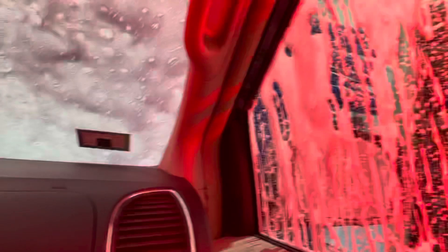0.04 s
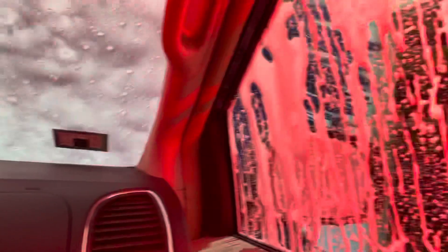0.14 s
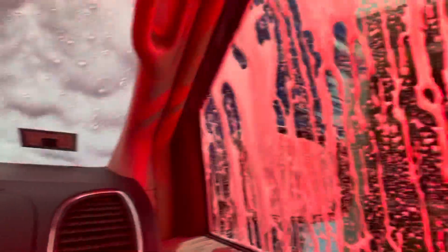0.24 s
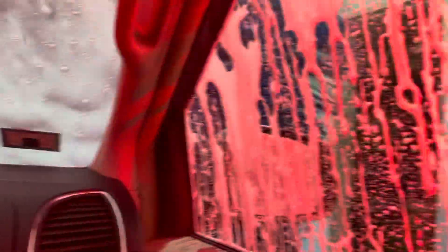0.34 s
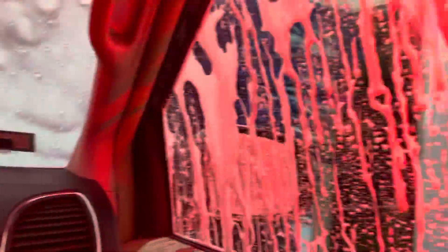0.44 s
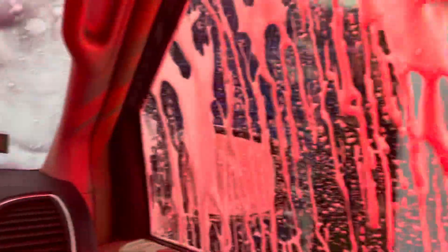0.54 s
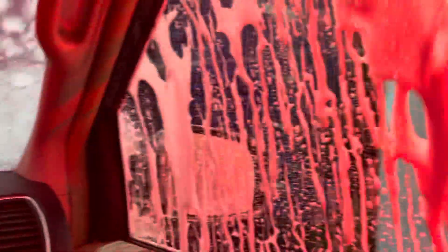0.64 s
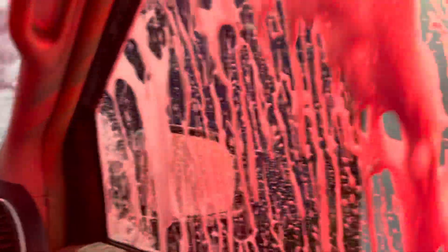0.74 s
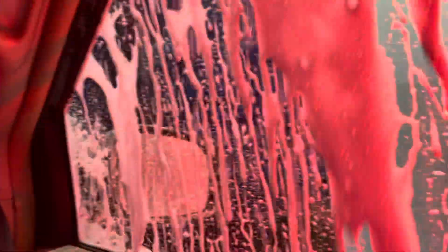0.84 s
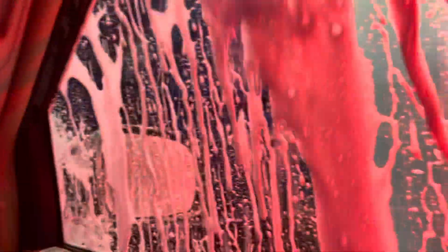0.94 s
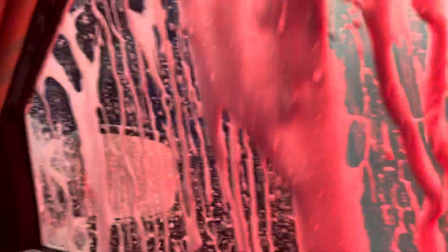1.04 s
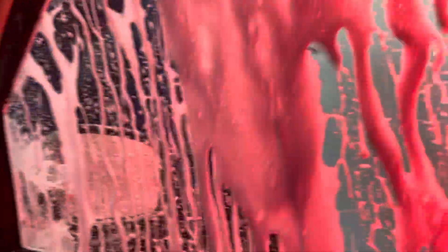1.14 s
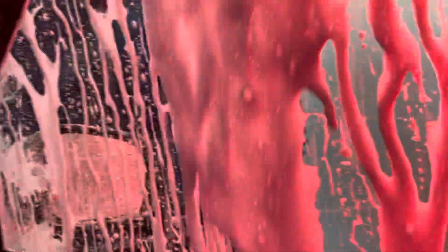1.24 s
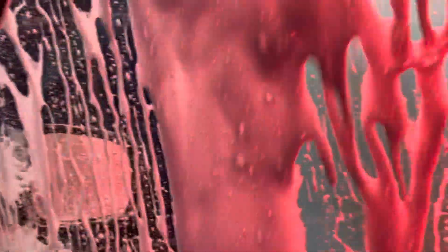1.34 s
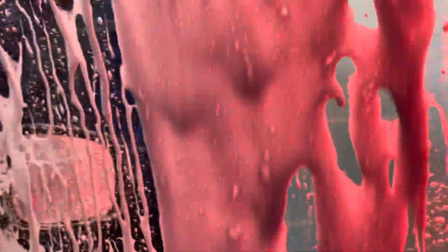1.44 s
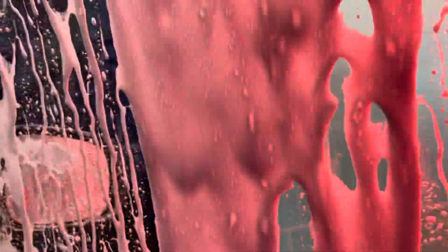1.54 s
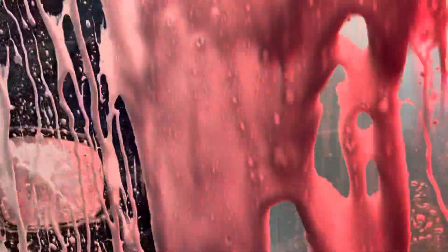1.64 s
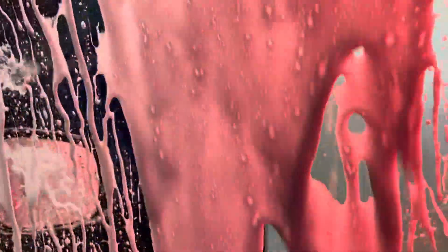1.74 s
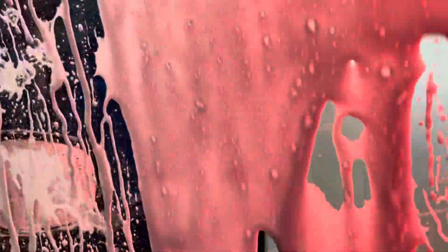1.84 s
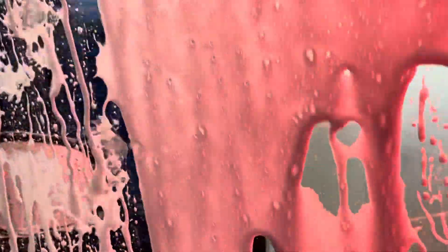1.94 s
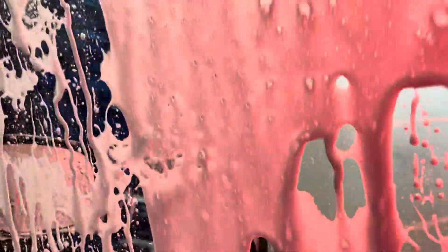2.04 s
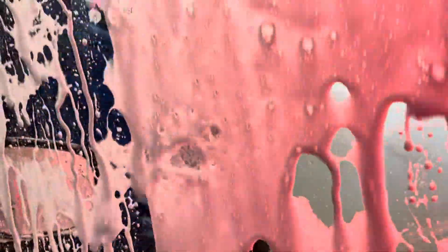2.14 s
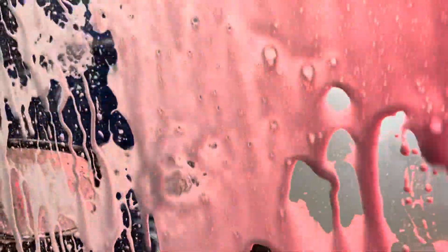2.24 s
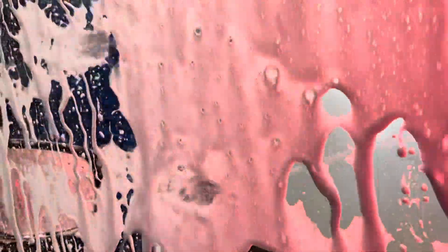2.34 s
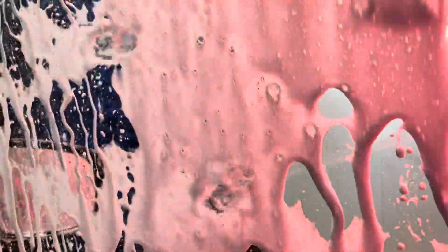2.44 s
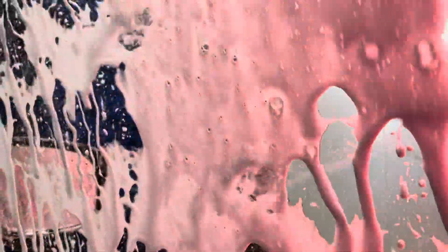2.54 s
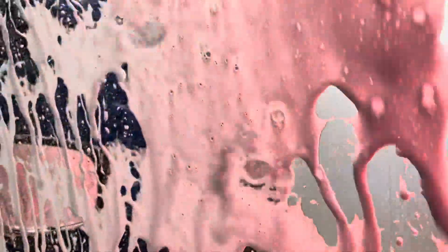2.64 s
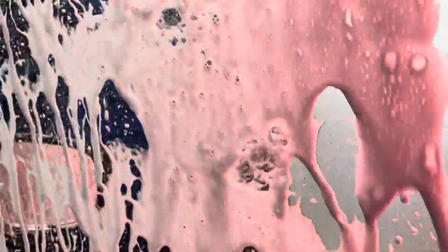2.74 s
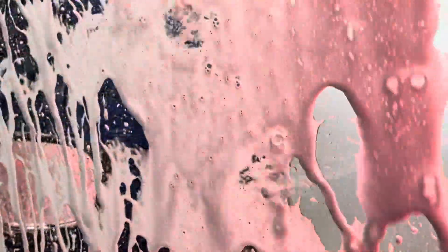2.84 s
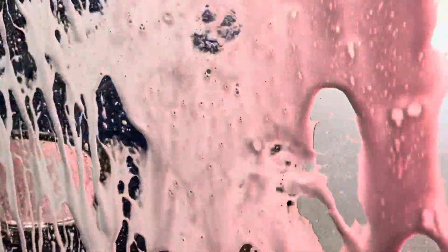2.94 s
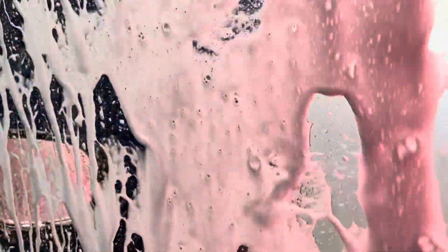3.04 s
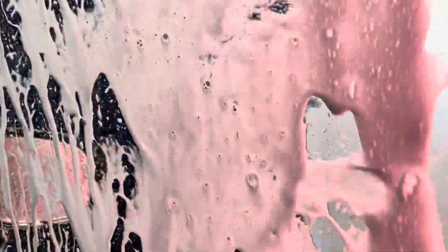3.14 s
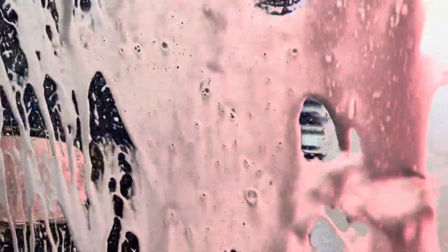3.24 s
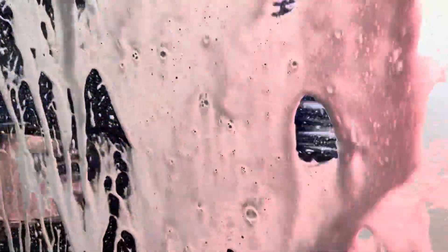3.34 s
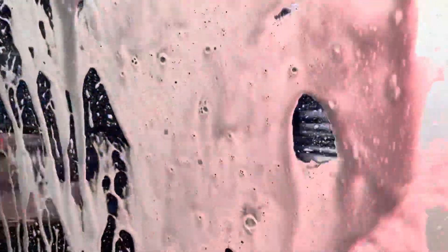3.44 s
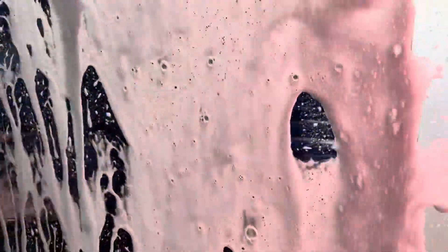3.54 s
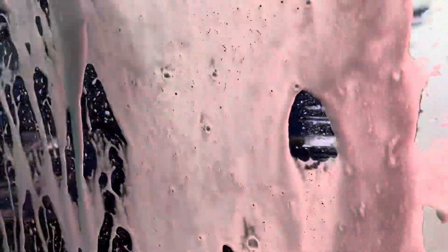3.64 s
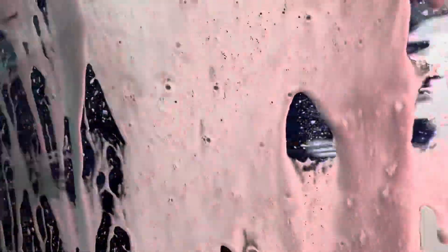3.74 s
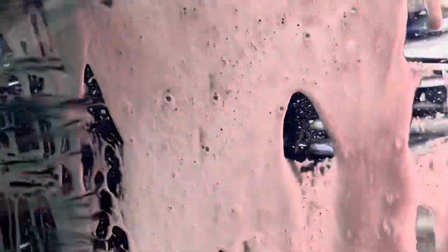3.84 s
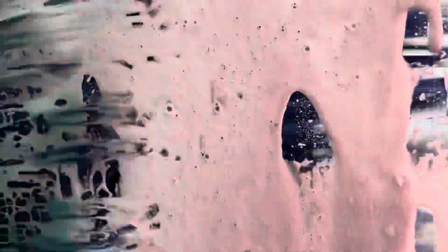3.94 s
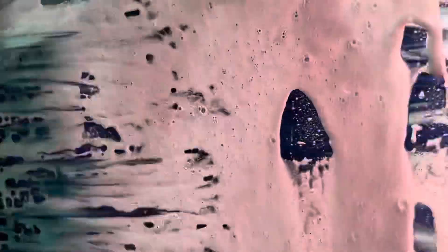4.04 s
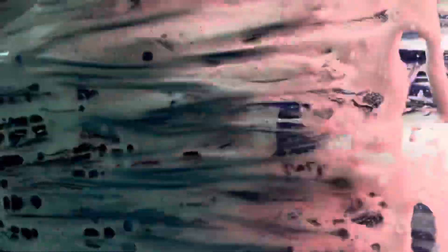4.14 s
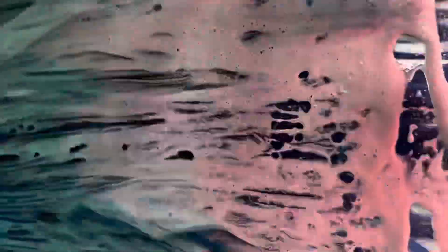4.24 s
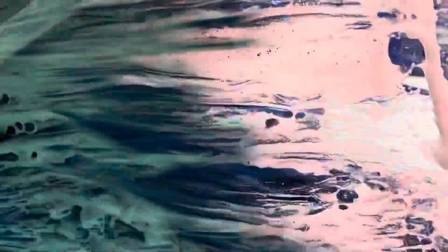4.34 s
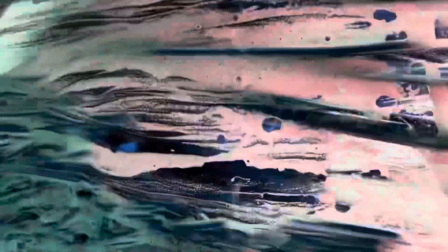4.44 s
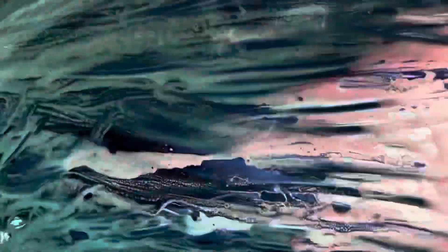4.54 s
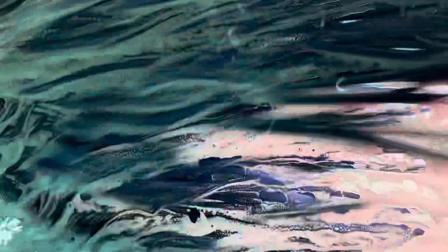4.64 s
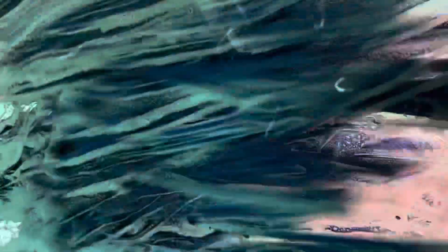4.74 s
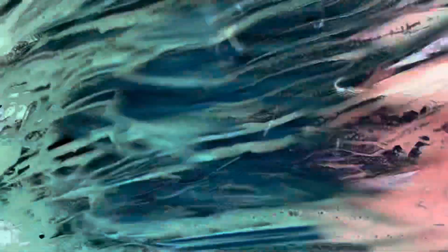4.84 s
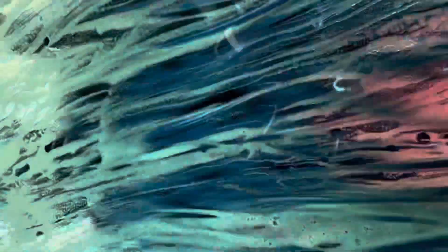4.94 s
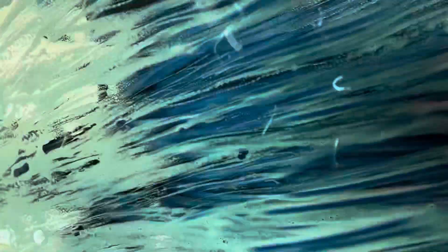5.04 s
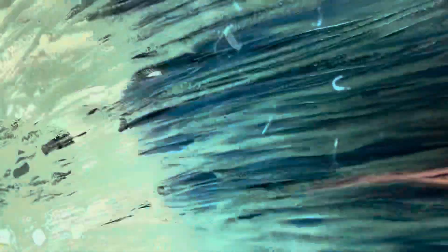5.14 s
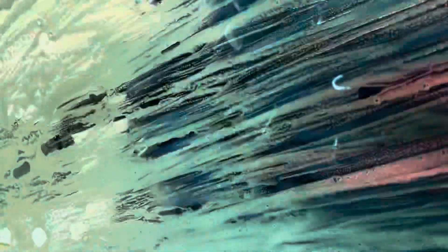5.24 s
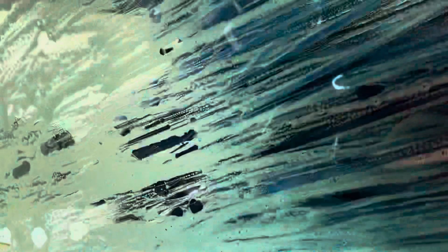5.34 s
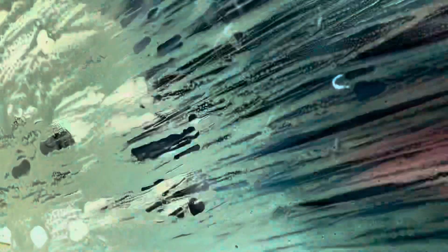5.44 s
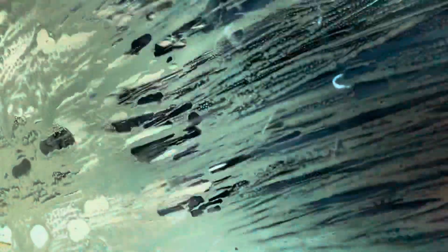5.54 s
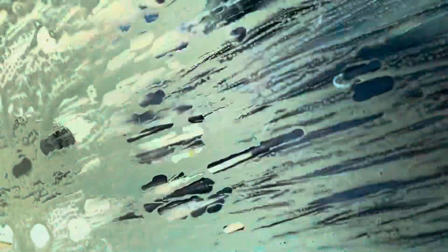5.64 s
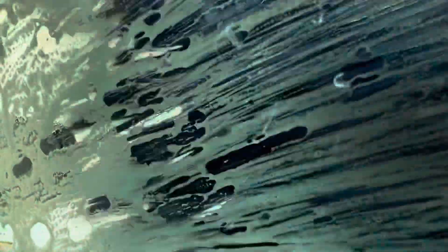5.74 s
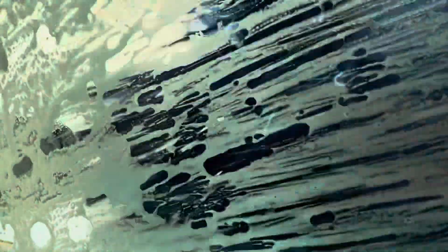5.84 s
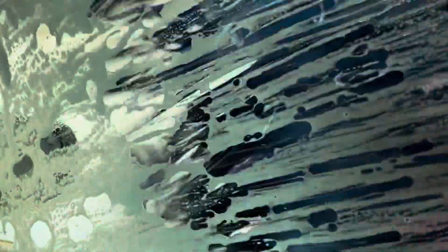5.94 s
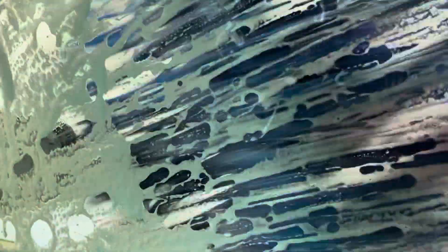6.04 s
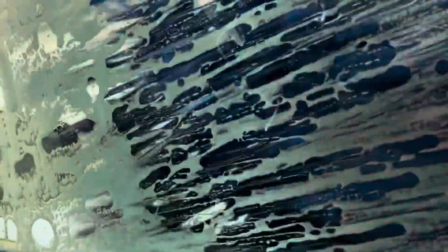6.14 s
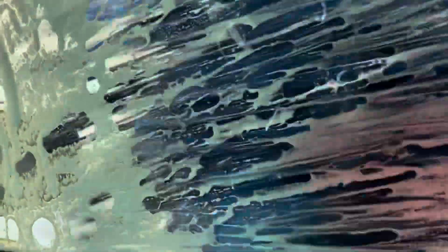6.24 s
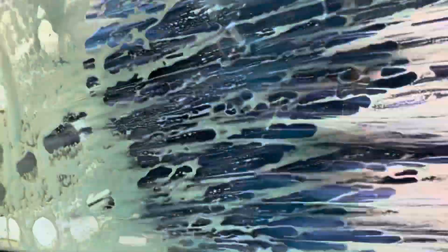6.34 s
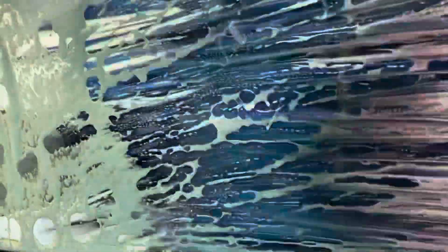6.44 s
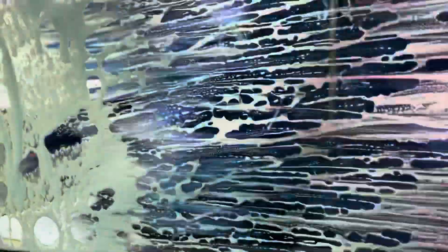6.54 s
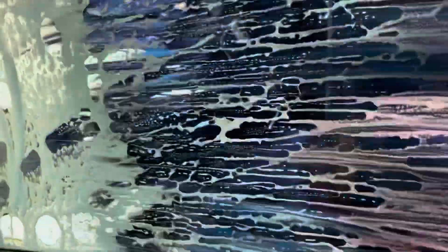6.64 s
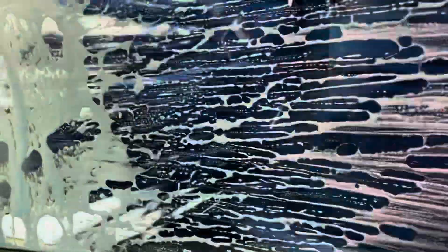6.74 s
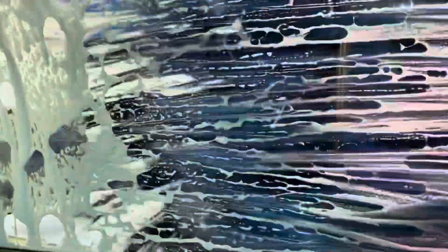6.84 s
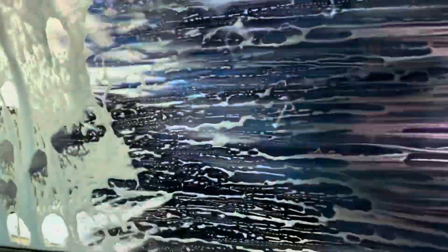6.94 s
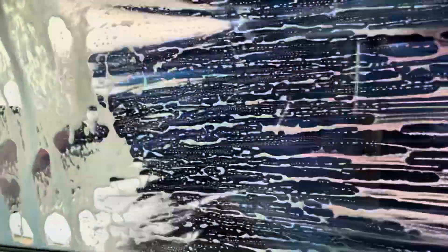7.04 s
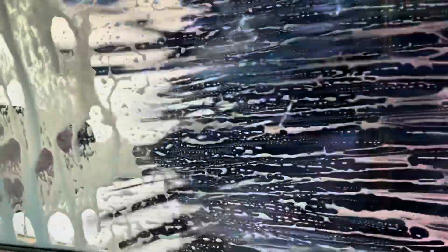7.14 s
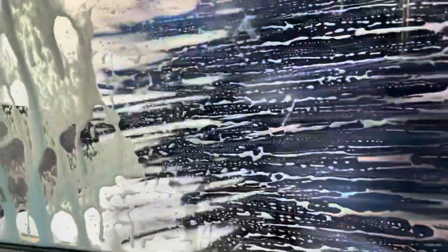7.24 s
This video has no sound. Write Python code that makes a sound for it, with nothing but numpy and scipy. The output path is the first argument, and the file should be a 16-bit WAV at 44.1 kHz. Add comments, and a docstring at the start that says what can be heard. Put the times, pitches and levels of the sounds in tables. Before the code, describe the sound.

The sound is heard in stereo from inside a closed car in a wash tunnel, boomy and short of treble. From 0 to 3.4 seconds water and foam drum deeply on the roof and patter finely on the glass, swelling slightly around 1.2 to 1.5 seconds and then easing. Soft low thumps of loaded panels and a faint, wavering mid-pitched motor whine lie within it. At about 3.5 seconds a spinning cloth brush reaches the side: light wet slaps and tiny ticks come first, growing dense and forceful from 4.3 to 5.1, with dull door knocks, heavy thumps and rough scrubbing. From 5.2 to 6.2 the distinct slaps stop, leaving smoother rubbing, fizzing water, broad swishes and occasional thuds, dipping near 5.8. Pressure returns around 6.2, and irregular slaps, knocks and a few sharp ticks near 6.8 continue over the rumble to the end at about 7.3.

```python
"""Inside a car in a wash tunnel, water and foam patter on the glass and drum on the roof over a faint motor whine.
Then a spinning cloth brush takes over at the side: wet strips slap the window one by one and scrub it.
Shaped noise gives the rubbing and the water, decaying sines the panels, brief resonances the struck glass.
The closed cabin booms and muffles the treble; a few sharp ticks come through. Two microphone ports hear it all.
"""
import sys
import numpy as np
from scipy import signal
from scipy.fft import rfft, irfft, next_fast_len
from scipy.io import wavfile
from scipy.ndimage import uniform_filter1d

SR = 44100
rng = np.random.default_rng(int(sys.argv[2]) if len(sys.argv) > 2 else 0)


def int16_out(signal):
    """Quantize to a 16-bit WAV file."""
    q = np.round(np.clip(np.atleast_2d(signal).T, -1, 1) * 32767)
    wavfile.write(sys.argv[1], SR, q.astype(np.int16))


N = 322371
T = np.arange(N) / SR
FADE_OUT = np.clip((T[-1] - T) / 0.004, 0, 1)
# padded by about a fifth of a second, so that filter tails do not wrap round
FFT_SIZE = 2 * next_fast_len(N // 2 + SR // 10)
HZ = np.maximum(np.fft.rfftfreq(FFT_SIZE, 1 / SR), 1)

# the brush reaches the side and takes over from the spray
ARRIVAL_S, TAKEOVER_S = 3.54, 0.22

# How hard the brush presses on the car. Each row: time in seconds, control level in dB.
BRUSH_PRESS = [(3.4, -20.5), (3.5, -11), (3.72, -9.5), (3.9, -5.5), (4.22, -1), (4.5, -0.5), (4.72, 1.5),
               (5.02, 4), (5.22, -0.5), (5.55, -1.5), (5.83, -5.5), (6.35, 1), (6.85, -2), (7.3, -1)]
# Flow of water and foam onto the car. Each row: time in seconds, control level in dB.
SPRAY_FLOW = [(0, 0.5), (0.6, 1.5), (1.2, 2), (1.47, 2), (1.8, 0), (2.35, -1), (3.3, -0.4)]
# Single cloth strips hitting the window. Each row: start in seconds, relative smack level in dB,
# drag time scale in seconds, ring of the glass in Hz, wet spit relative to the smack in dB,
# relative thud level of the door in dB.
STRIP_SLAPS = [(3.47, -19.5, 0.013, 2570, -24.5, -35.5), (3.501, -24, 0.005, 1490, -27, -38),
               (3.545, -25, 0.01, 2600, -22, -46), (3.633, -20.5, 0.022, 2930.0, -27, -38.5),
               (3.712, -23, 0.011, 1820, -30, -48.5), (3.749, -22.5, 0.02, 1103, -32, -39.5),
               (3.783, -20.5, 0.022, 1510.0, -34, -34.5), (3.827, -14.5, 0.015, 1440, -28, -31.5),
               (3.889, -21.5, .009, 1900, -33, -32), (3.907, -19.5, 0.009, 1120.0, -24, -29.5),
               (3.92, -17, 0.011, 1330, -34.5, -33.5), (3.961, -16, 0.004, 3140, -25, -32.5),
               (3.986, -18, 0.009, 1130, -29, -26), (4.008, -13, 0.0042, 1110, -34.5, -32),
               (4.042, -21, 0.016, 1700, -33, -30), (4.105, -22.5, 0.038, 2130, -24, -26.5),
               (4.149, -25, 0.019, 2650.0, -17, -33), (4.177, -19, 0.015, 1194, -23, -32),
               (4.271, -20, 0.029, 2150.0, -8.5, -24.5), (4.316, -15.5, 0.018, 2640, -25, -28),
               (4.442, -8, 0.012, 2760, -15.5, -25.5), (4.503, -16, 0.018, 1960, -17, -25.5),
               (4.537, -5.5, 0.0098, 2310, -22, -23), (4.595, -14.5, 0.017, 2050.0, -22, -27),
               (4.631, -11.5, 0.0092, 1850, -19, -21.5), (4.663, -20, 0.01, 2690, -12.5, -37.5),
               (4.707, -19, 0.028, 2050, -9.5, -23.5), (4.742, -14.5, 0.013, 2730.0, -15, -26),
               (4.809, -13, 0.013, 2500, -14.5, -25.5), (4.862, -14.5, 0.024, 2730, -18.5, -24.5),
               (4.958, -12.5, 0.014, 2140, -14.5, -20), (4.975, -13.5, 0.009, 1890, -21, -29.5),
               (5.022, -25.5, 0.018, 1630, -19.5, -33), (5.053, -16, 0.02, 1990, -14, -22.5),
               (5.118, -16.5, 0.013, 2060, -29, -36.5), (6.218, -19, 0.026, 2700, -14.5, -28.5),
               (6.386, -15.5, 0.016, 2520, -16, -27.5), (6.546, -21.5, 0.018, 2310, -24, -27),
               (6.628, -15, 0.015, 1950, -29.5, -32.5), (6.757, -19, 0.012, 2050, -27, -26),
               (6.784, -13.5, 0.021, 2570, -26, -30), (6.863, -25, 0.023, 2650.0, -11.5, -33),
               (6.907, -21.5, 0.014, 2200.0, -19, -30.5), (6.924, -16.5, 0.009, 2090, -22.5, -34.5),
               (7.063, -26, 0.0082, 2610.0, -21, -37.5), (7.083, -17, 0.011, 2200, -21.5, -35),
               (7.148, -25, 0.007, 2430.0, -16.5, -31)]
# Spectrum of strips scrubbing the glass. Each row: frequency in Hz, relative level in dB per Hz.
SCRUB_SPECTRUM = [(600, -6), (1100, -3.5), (1650, -4), (2130, -2.5), (2400, 1), (2750, -4), (3300, -8.5),
                  (4200, -24.5), (6000, -53)]
# Spectrum of the fizzing water film. Each row: frequency in Hz, relative level in dB per Hz.
WET_SPECTRUM = [(2000, -5.5), (3200, 8), (4200, 3.5), (5200, -1.5), (6400, -5.5), (8000, -45.5),
                (10000, -11.5), (12300, -20), (14000, -27.5)]
# Spectrum of cloth on the door. Each row: frequency in Hz, relative level in dB per Hz.
DOOR_SPECTRUM = [(180, -20), (330, 7.5), (470, 0.5), (600, 0), (740, 1.5), (930, -4), (1150, -9.5),
                 (1500, -13), (2500, -37.5)]


def undb(db):
    """Amplitude ratio of a level in decibels."""
    return 10 ** (np.asarray(db) / 20)


def unit(x):
    """Normalisation to an rms of 1."""
    return x / np.sqrt(np.mean(x ** 2))


def curves(table):
    """Linear interpolation in time of each column after the first."""
    s, *columns = np.transpose(table)
    return [np.interp(T, s, column) for column in columns]


def over_hz(points):
    """Interpolation of a (Hz, value) table along a logarithmic frequency axis."""
    hz, value = np.transpose(points)
    return np.interp(np.log(HZ), np.log(hz), value)


def colour(x, points):
    """Minimum-phase filter: the folded cepstrum gives a causal response of unit power gain for white noise."""
    roll_off = 1 / (1 + (HZ / points[-1][0]) ** 4)
    magnitude = unit(undb(over_hz(points)) * roll_off)
    cepstrum = irfft(np.log(magnitude), FFT_SIZE)
    cepstrum[1:FFT_SIZE // 2] *= 2
    cepstrum[FFT_SIZE // 2 + 1:] = 0
    response = np.exp(rfft(cepstrum))
    return irfft(rfft(x, FFT_SIZE) * response, FFT_SIZE)[..., :N]


def band(x, hz, q):
    """Single resonance of unit gain at its centre; q is the centre frequency over the bandwidth."""
    return signal.lfilter(*signal.iirpeak(hz, q, fs=SR), x)


def walk(rate):
    """Random fluctuation of about unit spread: independent values, rate per second, joined by ramps."""
    hold = max(int(SR / rate), 2)
    steps = np.repeat(rng.standard_normal(N // hold + 1), hold)
    return unit(uniform_filter1d(steps, hold)[:N])


def fade(x, seconds):
    """Exponential relaxation: every input dies away from its own height with this time constant."""
    return signal.lfilter([1], [1, -np.exp(-1 / (SR * max(seconds, 1 / SR)))], x)


def impacts(rate, spread_db):
    """Random arrivals, rate per second, with exponentially distributed levels."""
    size = undb(spread_db * np.minimum(rng.exponential(size=N), 3.5))
    return (rng.random(N) < rate / SR) * size


def grains(rate, spread_db, ring_s):
    """Shot noise: decaying impact energies modulate noise. Rows: shared by both ports, left only, right only."""
    # energy decays twice as fast as amplitude
    energy = fade(impacts(rate, spread_db) ** 2, ring_s / 2)
    return unit(np.sqrt(energy) * rng.standard_normal((3, N)))


def strike(times, sizes, rise_s, fades_s):
    """Impulsive force: each blow builds up smoothly to its given size and decays exponentially."""
    force = np.zeros(N)
    for s, size, fade_s in zip(times, sizes, fades_s):
        after = slice(int(s * SR), int(s * SR) + SR // 2)
        age = T[after] - s
        build_up = 1 - np.exp(-(age / rise_s) ** 2)
        shape = build_up * np.exp(-age / abs(fade_s))
        force[after] += size * shape / shape.max()
    return force


def swell(times, sizes, rises_s, fades_s):
    """Sliding force: each stroke grows exponentially to its peak and decays exponentially after it."""
    force = np.zeros(N)
    for s, size, rise_s, fade_s in zip(times, sizes, rises_s, fades_s):
        near = slice(max(int(s * SR) - SR // 4, 0), int(s * SR) + SR // 4)
        age = T[near] - s
        scale_s = np.where(age < 0, rise_s, fade_s)
        force[near] += size * np.exp(-np.abs(age / scale_s))
    return force


def driven(table, db, slope):
    """Power-law drive: level db when the control is at 0 dB, growing by slope dB per dB of control."""
    control_db, = curves(table)
    return undb(db + slope * control_db)


def contact():
    """Degree, 0 to 1, to which the brush at the side has replaced the spray."""
    return np.clip((T - ARRIVAL_S) / TAKEOVER_S, 0, 1)


def pressure():
    """Amplitude modulation by the cloth's contact, mostly dipping as it lifts off between bunches of strips."""
    # Each row: middle in seconds, level change in dB, half length in seconds.
    lulls = [(3.675, -0.5, 0.011), (3.873, 3.5, 0.0074), (3.957, -1.5, .009), (3.98, -5, .006),
             (4.078, -3.5, 0.021), (4.224, -5, 0.012), (4.392, -3, 0.015), (4.479, -8, 0.013),
             (4.588, -0.5, 0.0072), (4.678, -4, 0.0079), (4.8, -0.5, 0.0076), (4.946, -1.5, 0.0076),
             (5.014, -5.5, .007), (6.191, -1.5, 0.013), (6.265, -3.5, .012), (6.503, -0.5, .014),
             (6.712, -0.5, .016), (6.961, -2, 0.014), (7.033, -1, 0.0095), (7.119, -3.5, .012),
             (7.235, -4.5, 0.012)]
    change_db = sum(db * np.exp(-((T - s) / length_s) ** 2) for s, db, length_s in lulls)
    return undb(change_db)


def wander(x, centres_hz, depth_db, rate):
    """Changing modal excitation: as the contact point moves, a pane's resonances come forward or recede."""
    return x + sum(band(x, hz, q=6.1) * (undb(depth_db * walk(rate)) - 1) for hz in centres_hz)


def brush():
    """Sliding friction: overlapping strokes of wet strips modulate noise on glass and door."""
    # Freedom of the strips. Each row: time in seconds, 0 = flat on the glass to 1 = only the tips reach it.
    flail_curve = [(3.7, 0.6), (4.4, 0.39), (4.75, 0.38), (5.05, 0.35), (5.35, 0.17), (6.05, 0.19),
                   (6.6, 0.33), (7.3, 0.28)]
    # Regions in which the side window rings when rubbed, in Hz.
    pane_hz = [1250, 2000, 3060]
    flail = np.clip(curves(flail_curve)[0], 0, 1)
    # free strips rub choppily, flat ones smoothly
    chop = np.clip(0.99 * flail, 0, 0.4)
    strokes = fade(fade(impacts(rate=71, spread_db=1.0) ** 2, 0.0083), 0.0014)
    drag = np.sqrt(1 - chop + chop * strokes / strokes.mean())
    # while the strips fly freely, less of their force goes into rubbing
    scrub_gain = driven(BRUSH_PRESS, db=-35.0, slope=0.52) * undb(-9 * flail)
    rub_gain = driven(BRUSH_PRESS, db=-32.0, slope=0.57) * undb(-2.5 * flail)
    fizz_gain = driven(BRUSH_PRESS, db=-39.3, slope=0.41) * undb(-12.5 * flail + 1.4 * walk(22))
    sliding = grains(rate=1500, spread_db=-1.5, ring_s=0.0045) * drag
    # threads catch and snap free on the glass in a fine, uneven crackle
    threads = undb(-2.5) * grains(rate=300, spread_db=3.0, ring_s=0.0016)
    scrub = wander(colour(sliding + threads, SCRUB_SPECTRUM), pane_hz, depth_db=2.0, rate=28)
    rub = colour(grains(rate=980, spread_db=2.5, ring_s=0.0095) * drag, DOOR_SPECTRUM)
    # the water film fizzes as it is wiped off
    fizz = colour(grains(rate=2200, spread_db=4.0, ring_s=0.0079) * np.sqrt(drag), WET_SPECTRUM)
    return (scrub * scrub_gain + rub * rub_gain + fizz * fizz_gain) * pressure()


def slaps():
    """Impact followed by friction: a strip smacks the glass, spits out water, wipes, and thuds on the door."""
    # Thud on the door. Each row: frequency in Hz, relative level in dB per Hz.
    thud_spectrum = [(150, -6.5), (240, 4.5), (320, 1.5), (450, -1.5), (600, -3), (760, -1), (950, -7.5),
                     (1400, -14.5), (2200, -44)]
    s, peak_db, drag_s, _, spit_db, thud_db = np.transpose(STRIP_SLAPS)
    thud = strike(s, undb(thud_db), rise_s=0.0033, fades_s=1.93 * drag_s)
    spit = strike(s, undb(peak_db + spit_db - 5.5), rise_s=0.0057, fades_s=0.37 * drag_s)
    # the wipe and the spatter peak after the blow itself
    wipe = swell(s + 0.34 * drag_s, undb(peak_db - 16.5), rises_s=0.8 * drag_s, fades_s=0.51 * drag_s)
    spatter_size = undb(peak_db + spit_db - 6.5)
    spatter = swell(s + 0.78 * drag_s, spatter_size, rises_s=0.73 * drag_s, fades_s=0.78 * drag_s)
    drops = grains(rate=3700, spread_db=4.0, ring_s=0.0012)
    water = colour(np.hypot(spit, spatter) * drops, WET_SPECTRUM)
    cloth = colour(wipe * grains(rate=700, spread_db=1.5, ring_s=0.0018), SCRUB_SPECTRUM)
    door = colour(thud * rng.standard_normal((3, N)), thud_spectrum)
    return smacks() + water + cloth + door


def smacks():
    """Resonant impact: a cluster of droplets hits the wet glass and excites one brief ring per strip."""
    # Each row: frequency in Hz, relative level in dB per Hz.
    smack_spectrum = [(400, 11), (900, 4), (1500, 2), (2150, 4.5), (2700, 0), (3400, -4), (5000, -33.5)]
    out = np.zeros((3, N))
    droplets = grains(rate=1400, spread_db=2.4, ring_s=0.0009)
    for s, peak_db, drag_s, ring_hz, _, _ in STRIP_SLAPS:
        after = slice(int(s * SR), int(s * SR) + SR // 5)
        blow = strike([s], [undb(peak_db - 11.0)], rise_s=0.002, fades_s=[1.16 * drag_s])
        hit = droplets[:, after] * blow[after]
        ring = band(hit, ring_hz, q=6.3)
        out[:, after] += undb(-6.5) * hit + undb(3.5) * ring
    return colour(out, smack_spectrum)


def swishes():
    """Fluttering friction: a bundle of strips slides across the wet glass as a swell of fibre and water noise."""
    # Each row: peak time in seconds, relative level in dB, rise and fall time in seconds.
    bundles = [(3.798, -42.5, .012), (3.999, -35.5, 0.006), (4.125, -40, 0.011), (5.225, -34.5, 0.018),
               (5.33, -35.5, 0.017), (5.42, -37, 0.032), (5.511, -40.5, .02), (5.72, -42.5, 0.076),
               (5.96, -37.5, 0.038), (6.16, -36, 0.054), (6.31, -33, 0.026), (6.467, -35, 0.023),
               (6.585, -36, 0.029)]
    s, peak_db, length_s = np.transpose(bundles)
    flutter = undb(1.4 * walk(70))
    stroke = swell(s, undb(peak_db), length_s, length_s) * flutter
    fibres = colour(grains(rate=1400, spread_db=3.5, ring_s=0.002), SCRUB_SPECTRUM)
    water = colour(grains(rate=1300, spread_db=2.5, ring_s=0.0033), WET_SPECTRUM)
    return stroke * (fibres + undb(-3.0) * water)


def pummels():
    """Modal ringing: bunches of soaked cloth knock the door skin in two damped modes under a dull splat."""
    # Each row: start in seconds, relative level in dB, pitch of the lowest mode in Hz.
    knocks = [(4.276, -15, 450), (4.532, -21.5, 395), (4.589, -17.5, 293), (4.624, -14, 311),
              (4.695, -19, 259), (4.716, -20.5, 277), (4.742, -22, 289), (4.815, -14, 344),
              (4.841, -17, 247), (4.867, -16, 306), (4.917, -14.5, 346), (4.975, -17.5, 374),
              (4.993, -15, 254), (5.022, -12, 255), (5.056, -16, 291), (5.098, -17, 285), (5.168, -15, 286),
              (5.209, -15.5, 284), (5.252, -18, 274), (5.508, -18, 289), (5.682, -20, 258.5),
              (6.089, -16, 272), (6.332, -22.5, 281), (6.458, -20, 224.5), (6.536, -17.5, 312),
              (6.630, -21.5, 259), (6.744, -17, 289), (6.884, -19.5, 258), (7.078, -17, 287),
              (7.173, -17.5, 273)]
    overtone_ratio, overtone_db = 1.9, -13.5
    out = np.zeros((3, N))
    splat = colour(rng.standard_normal((3, N)), DOOR_SPECTRUM)
    for s, peak_db, hz in knocks:
        after = slice(int(s * SR), int(s * SR) + SR // 6)
        swing = strike([s], [undb(peak_db - 2.0)], rise_s=0.0048, fades_s=[0.008])[after]
        angle = 2 * np.pi * (hz * (T[after] - s) + rng.random())
        modes = np.sin(angle) + undb(overtone_db) * np.sin(overtone_ratio * angle)
        out[0, after] += swing * modes
        out[:, after] += swing * undb(-13.5) * splat[:, after]
    return out


def ticks():
    """Short impact, wide spectrum: flung drops snap on the glass, ping it and may crack in the top treble."""
    # Each row: start in seconds, relative level in dB, ring time scale in seconds,
    # treble crack relative to the tick in dB.
    drops = [(3.466, -36.5, 0.0043, -30), (3.5725, -39.5, 0.0029, -30), (3.802, -39, 0.0059, 2),
             (3.8145, -37.5, 0.0028, 5), (4.155, -39.5, 0.0025, -20), (4.266, -40, .004, -4.5),
             (4.451, -30.5, 0.0061, -2), (4.4565, -39, 0.0071, -2), (4.711, -38.5, .005, -18),
             (4.81, -37.5, 0.0047, 0), (6.3889, -56.5, 0.0061, -10.5), (6.797, -33, 0.0084, 0.5),
             (6.812, -34, 0.0066, -10), (6.8359, -38, 0.01, -6)]
    # Each row of both spectra: frequency in Hz, relative level in dB per Hz.
    tick_spectrum = [(1500, -10), (3000, 9.5), (5500, 6), (7000, -9)]
    crack_spectrum = [(5000, -3.5), (8000, -12), (10500, -5.5), (12500, -9.5), (15500, -12.5)]
    s, peak_db, ring_s, crack_db = np.transpose(drops)
    snap = strike(s, undb(peak_db + 3.0), rise_s=0.00022, fades_s=0.22 * ring_s)
    tick = strike(s, undb(peak_db - 6.0), rise_s=0.00089, fades_s=ring_s)
    crack = strike(s, undb(peak_db + crack_db - 3.0), rise_s=0.0004, fades_s=0.45 * ring_s)
    knock = colour(np.hypot(snap, tick) * rng.standard_normal((3, N)), tick_spectrum)
    ping = undb(1.0) * band(knock, hz=3670, q=16) + undb(4.0) * band(knock, hz=2590, q=22)
    return knock + ping + colour(crack * rng.standard_normal((3, N)), crack_spectrum)


def body():
    """Structure-borne sound: water and cloth shake the roof and side panels, which pump the cabin's air."""
    # Each row of the three spectra: frequency in Hz, relative level in dB per Hz.
    boom_spectrum = [(20, -10), (30, -8), (40, 4), (52, 12), (68, 11.5), (95, 10.5), (120, 9), (160, -8.5),
                     (300, -66.5)]
    drum_spectrum = [(70, -21), (105, -12), (130, 0), (155, 4.5), (178, -0.5), (205, -13.5), (300, -25)]
    panel_spectrum = [(100, -23.5), (160, 0.5), (200, 4.5), (260, 1.5), (320, -4), (400, -9.5),
                      (700, -63.5)]
    # the water's share of the power falls as the brush takes over
    water = np.sqrt(1 - np.clip(0.44 * contact(), 0, 1))
    # independent sources add in power
    boom_gain = np.hypot(water * driven(SPRAY_FLOW, db=-27.0, slope=0.38),
                         driven(BRUSH_PRESS, db=-21.0, slope=0.46))
    roof_gain = np.hypot(water * driven(SPRAY_FLOW, db=-28.5, slope=2.4),
                         driven(BRUSH_PRESS, db=-25.5, slope=0.96))
    side_gain = np.hypot(water * driven(SPRAY_FLOW, db=-33.0, slope=0.64),
                         driven(BRUSH_PRESS, db=-26.5, slope=0.73))
    boom = colour(grains(rate=6800, spread_db=6.0, ring_s=0.02), boom_spectrum)
    roof = colour(grains(rate=1300, spread_db=2.5, ring_s=0.0099), drum_spectrum)
    sides = colour(grains(rate=600, spread_db=0.5, ring_s=0.0081), panel_spectrum)
    return boom * boom_gain + roof * roof_gain + sides * side_gain * pressure()


def thumps():
    """Damped oscillation: a load of water or cloth pushes a panel in, and it swings back a few times."""
    # Each row: start in seconds, relative level in dB, panel pitch in Hz.
    blows = [(0.18, -21, 100), (0.455, -18, 123.5), (0.692, -14, 133), (1.204, -20.5, 139.5),
             (1.257, -19, 100.3), (1.417, -14.5, 107.6), (1.763, -18, 72.4), (1.916, -20, 87),
             (2.522, -12.5, 83.2), (2.754, -15.5, 82), (4.29, -12, 123.6), (4.39, -9.5, 92.7),
             (4.446, -11.5, 101), (4.559, -12, 118), (4.77, -14, 110), (4.862, -12, 79), (4.97, -14.5, 112),
             (5.07, -11.5, 125.4), (5.345, -13, 130.6), (5.538, -17, 93.7), (5.845, -12.5, 107.7),
             (6.184, -15.5, 215.6), (6.231, -14, 83), (6.309, -14.5, 108), (6.391, -14.5, 96),
             (6.453, -17.5, 94), (6.607, -11.5, 90.6), (6.746, -18.5, 98.6), (6.926, -12.5, 103)]
    out = np.zeros((3, N))
    for s, peak_db, panel_hz in blows:
        after = slice(int(s * SR), int(s * SR) + SR // 4)
        swing = strike([s], [undb(peak_db)], rise_s=0.0093, fades_s=[0.018])[after]
        angle = 2 * np.pi * (panel_hz * (T[after] - s) + rng.random())
        out[0, after] += swing * np.sin(angle)
    return out


def passes():
    """Resonance under random force: a panel drones unevenly while a jet or the brush travels over it."""
    # Each row: middle in seconds, half length in seconds, panel pitch in Hz, sharpness (q), relative level in dB.
    drones = [(1.383, 0.31, 742, 3.5, -40.5), (1.65, 0.25, 74.3, 1.2, -29), (4.304, 0.29, 134.4, 2.7, -27),
              (4.967, 0.47, 310, 2.6, -33), (4.848, 0.23, 2020, 6.4, -39), (6.489, 0.47, 71, 0.78, -25.5),
              (6.55, 0.55, 204, 3, -31.5)]
    out = 0
    for s, length_s, hz, q, peak_db in drones:
        noise = rng.standard_normal((3, N))
        ring = unit(band(band(noise, hz, q), hz, q))
        approach = np.exp(-((T - s) / length_s) ** 2)
        out = out + ring * undb(peak_db + 1.8 * walk(14)) * approach
    return out


def spray():
    """Shot noise of drop impacts: fine drops patter on the glass and heavier ones splash on the roof."""
    # Each row of both spectra: frequency in Hz, relative level in dB per Hz.
    glass_spectrum = [(600, -13.5), (1100, -4), (1600, -4.5), (2100, -3.5), (2400, 0.5), (2750, -5.5),
                      (3300, -7), (4200, -13.5), (5300, -18), (6500, -23), (8000, -60.5), (10000, -24),
                      (12300, -31), (14000, -36)]
    roof_spectrum = [(200, -10), (350, 1.5), (480, 0.5), (600, -1.5), (740, 0.5), (850, -3), (1050, -11.5),
                     (1400, -13.5), (2500, -30)]
    surge_db = 0.19 * walk(13)
    fine = grains(rate=2400, spread_db=2.2, ring_s=0.005)
    heavy = grains(rate=900, spread_db=1.6, ring_s=0.008)
    patter = colour(fine, glass_spectrum) * driven(SPRAY_FLOW, db=-43.5, slope=0.59)
    splash = colour(heavy, roof_spectrum) * driven(SPRAY_FLOW, db=-41.0, slope=1.17)
    return (patter + splash) * undb(surge_db)


def motor():
    """Frequency modulation: the machinery outside whines faintly at a wavering pitch, shared by both ports."""
    whine_hz = 711 * (1 + 0.01077 * walk(25))
    phase = 2 * np.pi * np.cumsum(whine_hz) / SR
    whine = np.sin(phase) * undb(-51 + 3.5 * walk(7.8))
    return whine * np.array([[1], [0], [0]])


def cabin():
    """Modal response of an enclosure: sound inside is coloured by resonances of air, panels and panes."""
    # Each row: centre in Hz, width in Hz, lift of this mode alone in dB.
    modes = [(50.3, 4, 6.5), (90.7, 20, 3.5), (213.6, 27, 4), (272.5, 16, 3.5), (332, 42, 3.5),
             (440.6, 35, 5.5), (508.3, 26, 5.5), (591, 42, 4), (714, 18, 3.5), (780, 22, 2), (917, 63, 4),
             (1028, 31, 5), (1247, 130, 3.5), (1397, 36, 3), (1670, 140, 4), (1940, 80, 4.5),
             (2137, 70, 4.5), (2564, 44, 2.5), (2767, 187, 6), (3056, 53, 2.5), (4120, 300, -3)]
    response = 1
    for hz, width_hz, lift_db in modes:
        resonance = 1 / (1 + 1j * hz / width_hz * (HZ / hz - hz / HZ))
        response = response * (1 + (undb(lift_db) - 1) * resonance)
    return response * undb(-1.64)


def ports(sound, lead, balance):
    """Partial coherence: the two ports hear alike bass, but window reflections make them differ higher up."""
    # Each row: frequency in Hz, likeness of the two ports from 0 to 1.
    likeness_curve = [(45, 0.97), (76, 0.96), (100, 0.985), (165, 0.96), (210, 0.84), (270, 0.69),
                      (420, 0.49), (750, 0.35), (1100, 0), (1600, 0.02), (2100, 0.5), (2750, 0.68),
                      (3800, 0.3), (4200, 1), (5300, 0.4), (5800, 0), (10500, 0.06)]
    shared, *own = rfft(sound * FADE_OUT, FFT_SIZE)
    likeness = np.clip(over_hz(likeness_curve), 0, 1)
    side = np.array([[1], [-1]]) / 2
    common = np.sqrt(likeness) * shared * np.exp(1j * side * over_hz(lead))
    pair = common + np.sqrt(1 - likeness) * np.array(own)
    # diffuse sound partly cancels between the ports, so each hears more than their mean
    mean_power = (1 + likeness * np.cos(over_hz(lead))) / 2
    return pair * undb(side * over_hz(balance)) / np.sqrt(mean_power)


def scene():
    """Superposition: the brush at the side replaces the spray from above, and the body's rumble moves with it."""
    # Phase by which the left port leads, from above and from the side. Each row: frequency in Hz, lead in radians.
    roof_lead = [(110, 0), (210, 0.05), (280, 1.1), (470, 0.93), (800, 0.9), (1500, 2), (2100, 0),
                 (2800, -0.5), (3300, -0.3), (4300, 1.4), (6000, -3), (10500, -1.2)]
    window_lead = [(50, 0), (100, 0.05), (135, 0.13), (210, 0.24), (280, -.55), (350, -0.7), (470, -1.25),
                   (1400, -0.98), (1500, 2.4), (2050, 0.3), (2800, -0.2), (3600, -0.36), (5000, -1.1),
                   (6000, -0.5), (10500, -2)]
    # Left minus right, from above and from the side. Each row: frequency in Hz, level difference in dB.
    roof_balance = [(60, 1.5), (100, -.8), (160, -2), (215, -5.5), (330, -6.5), (470, 1.5), (780, -1),
                    (1300, 0), (2180, -2.0), (3630, -4.5), (6070, -1)]
    window_balance = [(55, -0.8), (90, 0.4), (160, -1.1), (210, -6.5), (270, -4), (340, -4.3), (470, -1.5),
                      (780, -3.5), (1300, -1.5), (2180, -2.5), (3630, -4.5), (6070, -1)]
    rumble = body() + passes() * pressure() + thumps()
    # the same rumble crossfades in amplitude, the unrelated spray and brush in power
    above = (1 - contact()) * rumble + np.sqrt(1 - contact()) * spray() + motor()
    cloth = np.sqrt(contact()) * brush() + slaps() + swishes() + pummels()
    beside = contact() * rumble + cloth + ticks()
    heard = ports(above, roof_lead, roof_balance) + ports(beside, window_lead, window_balance)
    return irfft(heard * cabin(), FFT_SIZE)[:, :N]


def record(dry):
    """Band limitation: a steep elliptic low-pass removes the treble above 15.7 kHz."""
    low_pass = signal.ellip(8, 0.2, 70, 15700, fs=SR, output="sos")
    return signal.sosfilt(low_pass, dry)


dry = scene()
out = record(dry)
int16_out(out)
```